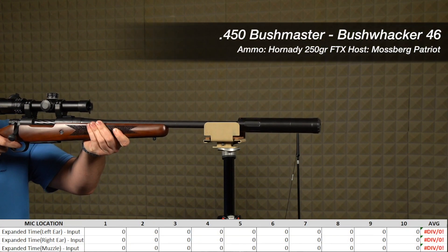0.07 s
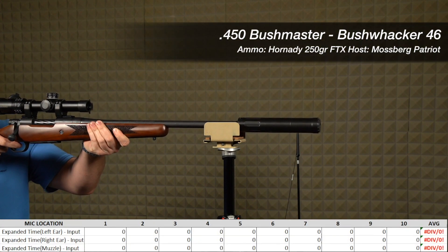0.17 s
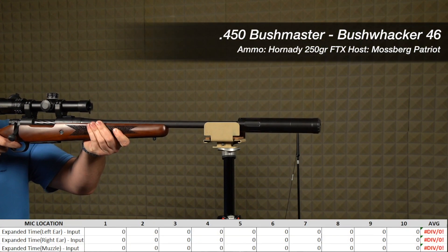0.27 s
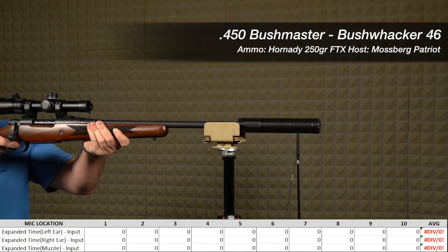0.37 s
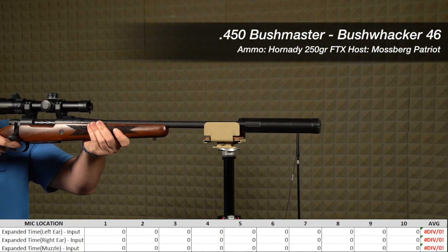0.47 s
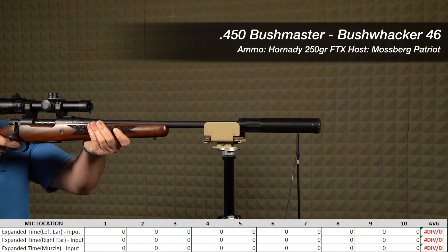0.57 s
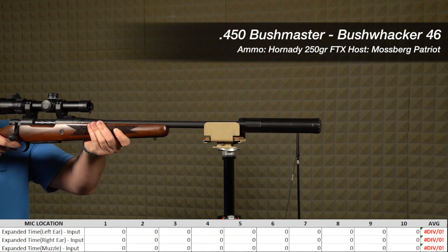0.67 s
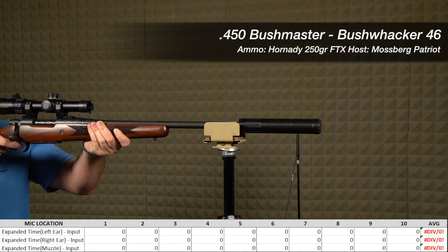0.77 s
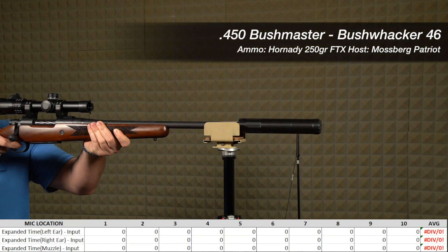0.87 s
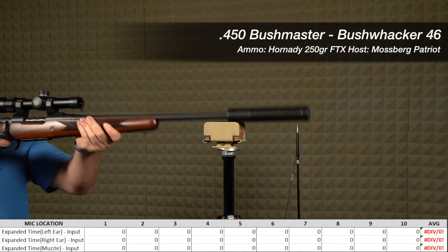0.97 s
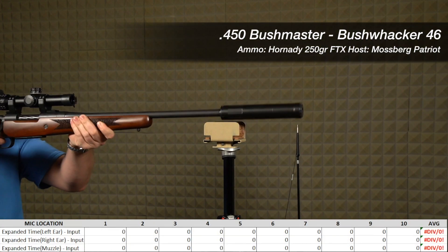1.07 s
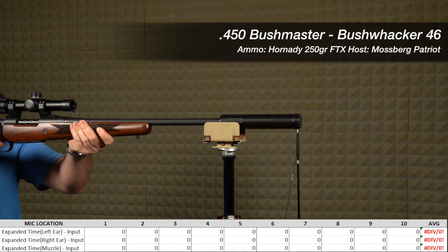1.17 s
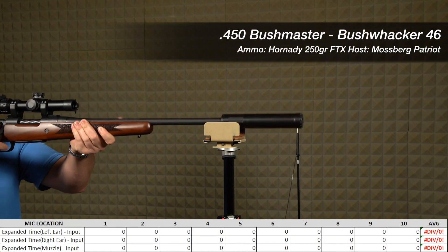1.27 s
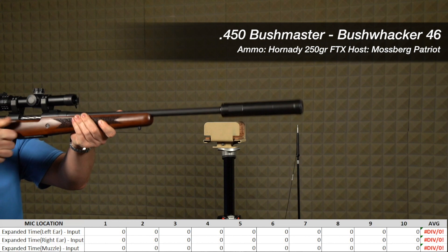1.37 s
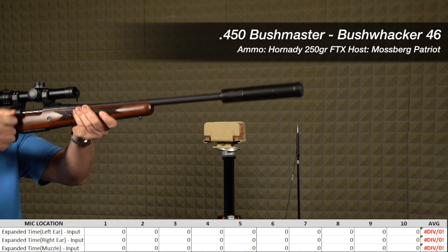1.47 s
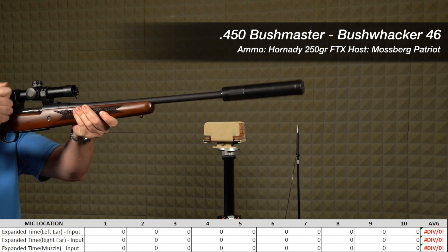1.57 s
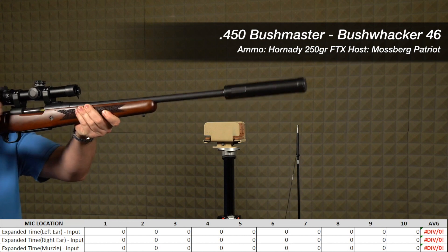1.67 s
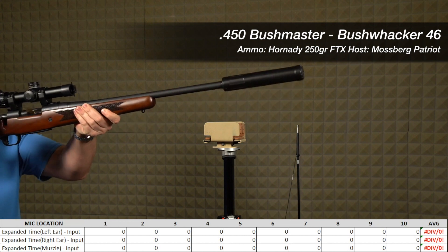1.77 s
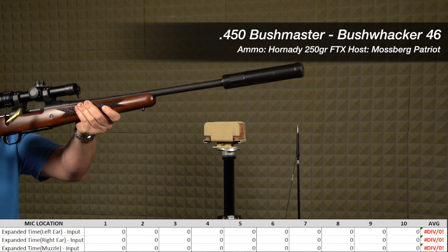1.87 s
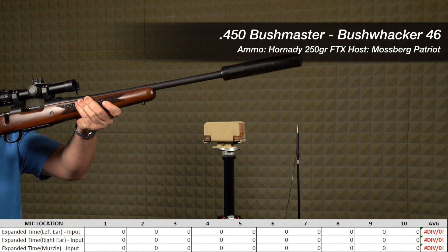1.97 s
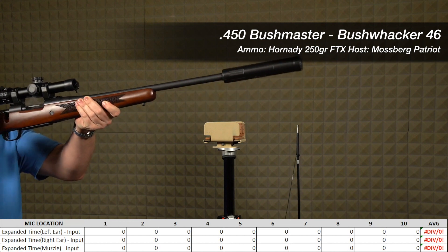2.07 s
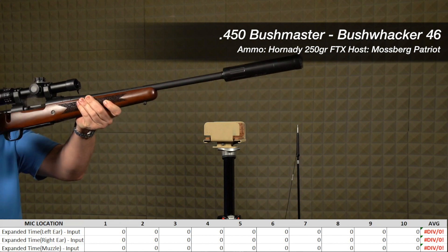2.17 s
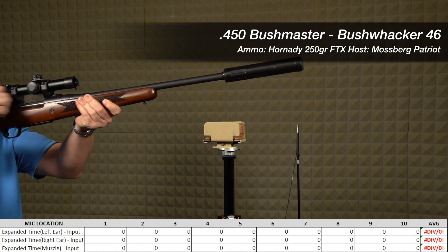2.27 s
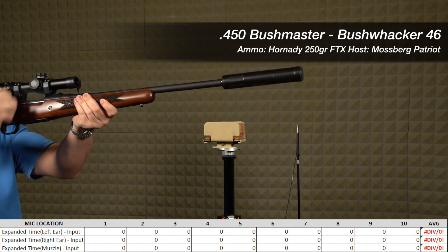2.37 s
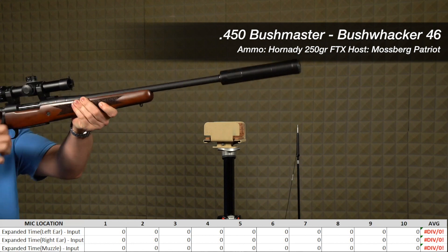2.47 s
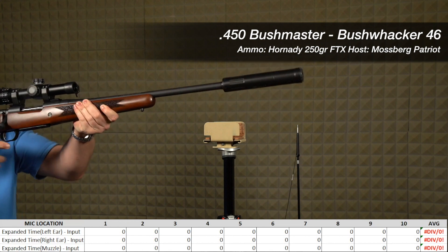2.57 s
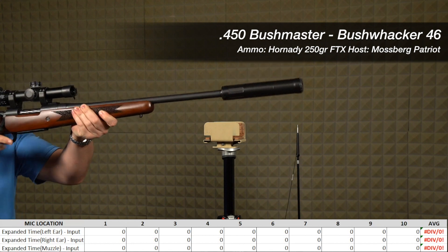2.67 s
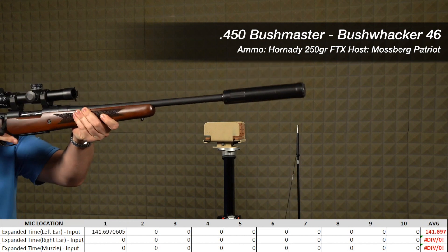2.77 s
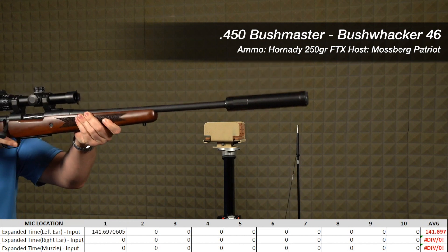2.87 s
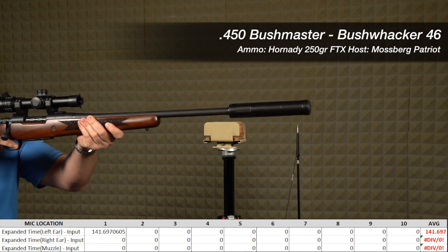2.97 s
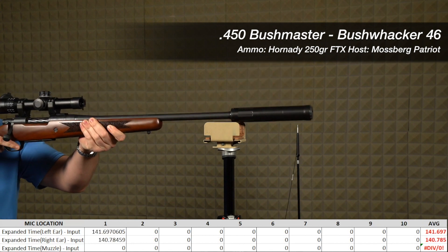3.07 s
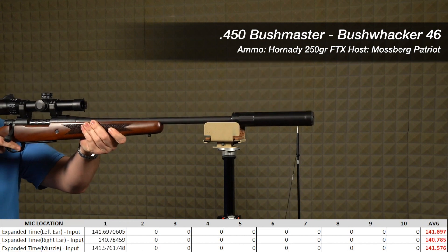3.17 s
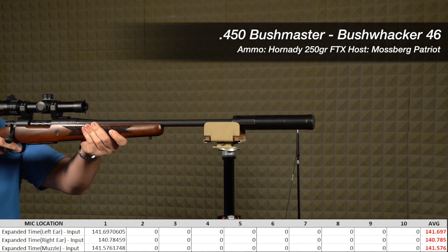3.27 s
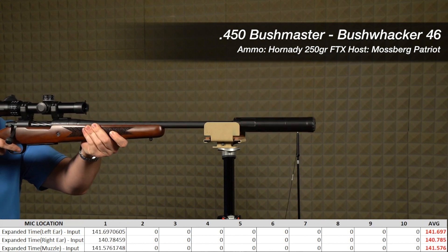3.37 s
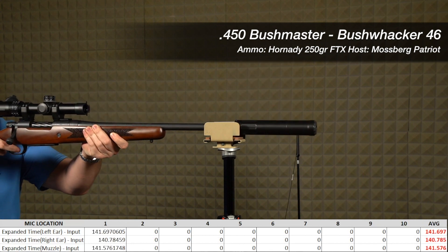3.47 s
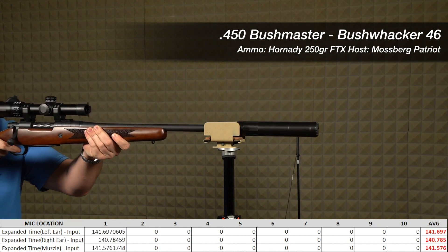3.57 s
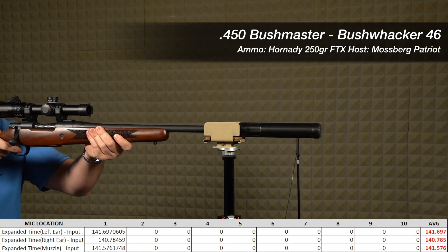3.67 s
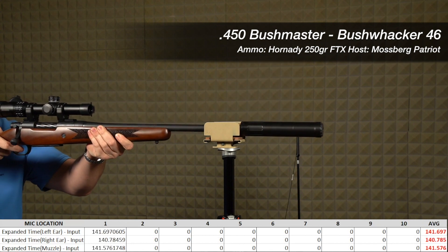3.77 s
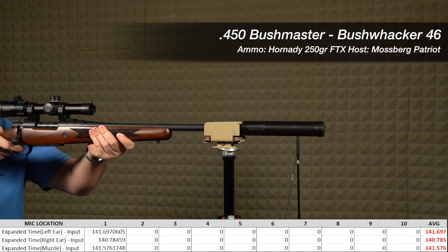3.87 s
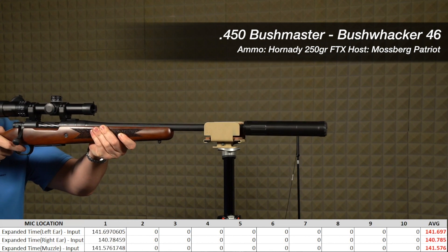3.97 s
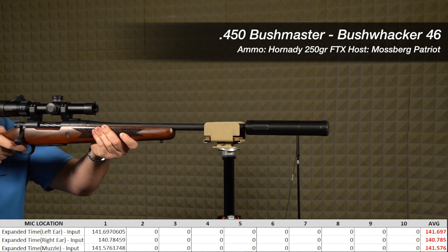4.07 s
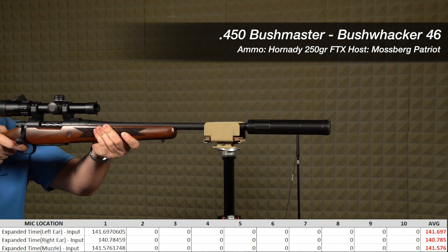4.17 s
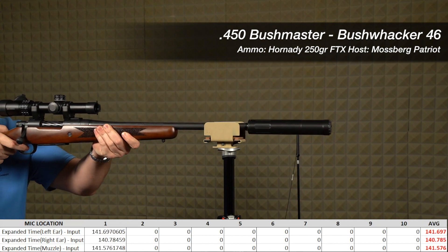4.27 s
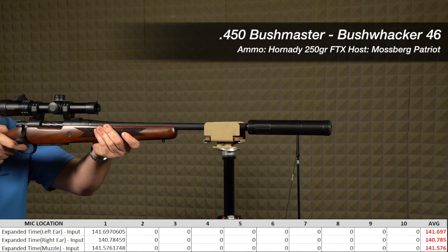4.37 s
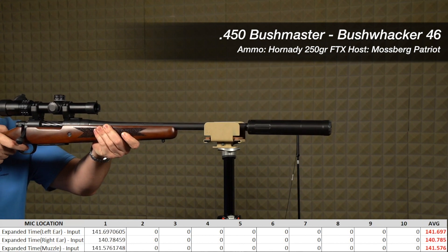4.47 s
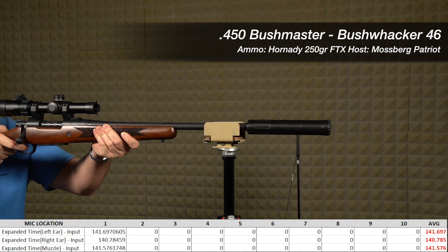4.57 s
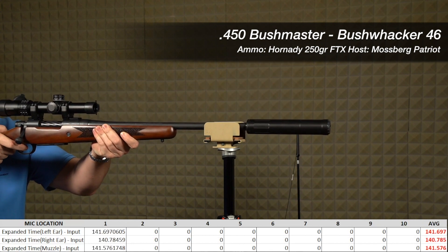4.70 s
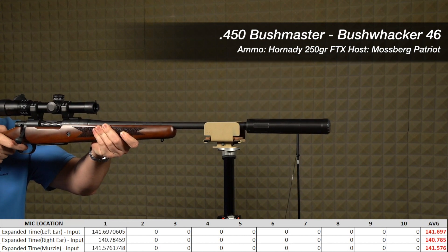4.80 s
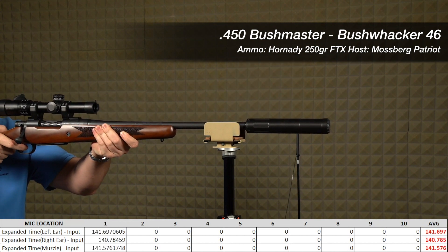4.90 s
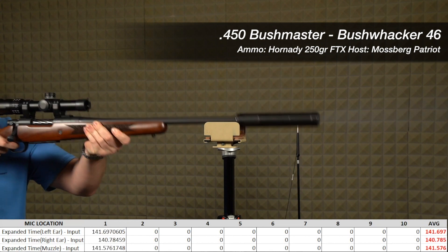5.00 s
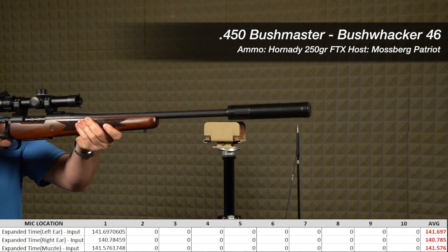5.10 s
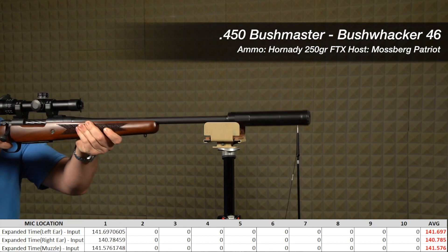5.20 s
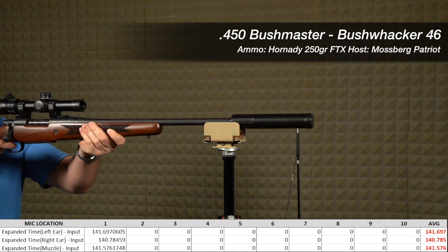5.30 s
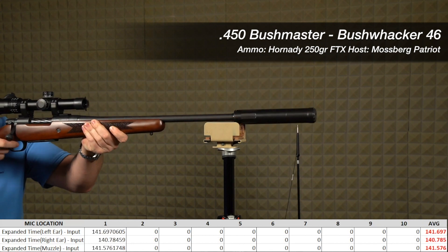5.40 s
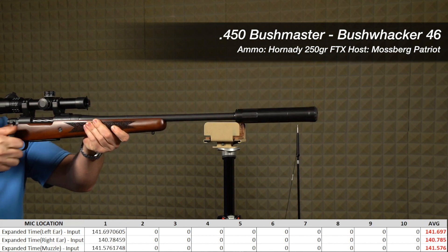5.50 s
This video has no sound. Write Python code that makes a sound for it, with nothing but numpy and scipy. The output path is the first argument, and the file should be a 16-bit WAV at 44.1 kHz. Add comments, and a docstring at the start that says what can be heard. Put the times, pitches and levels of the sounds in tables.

```python
"""A foam-lined booth that opens on an indoor range: two shots from a suppressed bolt-action rifle.
Each blast, decaying noise on swings of pressure, overloads the microphone; a swelling, dying wash answers it.
Between the shots the bolt is lifted, drawn back, run forward and locked: noisy contacts excite modes of steel
and stock. The spent case bounces away, its brass modes beating in pairs; hands bump, rub and tap.
Ventilation murmurs underneath as shaped noise with faint fan tones."""
import sys
import numpy as np
from scipy import signal
from scipy.fft import rfft, irfft, next_fast_len
from scipy.io import wavfile
from scipy.ndimage import uniform_filter1d

SR = 44100
rng = np.random.default_rng(int(sys.argv[2]) if len(sys.argv) > 2 else 0)


def generate_wav(signal):
    """Clip the signal to [-1, 1] and save it as 16-bit WAV at the path in sys.argv[1]."""
    frames = np.transpose(np.atleast_2d(signal))
    scaled = np.clip(frames, -1, 1) * 32767
    pcm = np.round(scaled).astype(np.int16)
    wavfile.write(sys.argv[1], SR, pcm)


N = 244314

# Spectrum of contact noise, before any tilt: [f/Hz, level/dB]
CONTACT_SPECTRUM = [(100, -18), (500, -13), (900, 0), (2200, 10), (3200, 6), (6000, 2), (10000, -1.1),
                    (16000, -14.5)]


def amp(db):
    """Level as gain: 20 dB is a factor of ten in pressure."""
    return 10 ** (np.asarray(db) / 20)


def evened(x):
    """Normalisation to an rms value of 1."""
    return x / np.sqrt(np.mean(x ** 2) + 1e-20)


def read(points, hz, axis=1):
    """Interpolation of one table column along a logarithmic frequency axis."""
    columns = np.transpose(points)
    return np.interp(np.log(hz + 1), np.log(columns[0] + 1), columns[axis])


def add(mix, s, sound):
    """Superposition: pressures add, here from time s onward."""
    part = mix[round(s * SR):][:len(sound)]
    part += sound[:len(part)]


def seconds(length):
    """Sampled time axis of the given length in s."""
    return np.arange(int(length * SR)) / SR


def colour(x, points, tilt_db=0, size=4096):
    """Minimum-phase filtering: the Hilbert transform of log gain gives the phase of a causal filter."""
    hz = np.fft.rfftfreq(size, 1 / SR)
    octaves = np.log2(np.maximum(hz, 400) / 3000)  # the tilt pivots at 3 kHz and is held below 400 Hz
    log_gain = np.log(amp(read(points, hz) + tilt_db * octaves))
    circle = np.r_[log_gain, log_gain[-2:0:-1]]
    taps = np.fft.ifft(np.exp(np.conj(signal.hilbert(circle)))).real
    return signal.fftconvolve(x, taps)[:len(x)]


def ring(t, hz, db, t60):
    """Damped mode: a sinusoid that loses 60 dB in t60."""
    return amp(db - 60 * t / t60) * np.sin(2 * np.pi * hz * t)


def dying_noise(t, table, tilt_db=0, count=36):
    """Frequency-dependent decay: each overlapping band of noise has its own level and t60."""
    hz = np.fft.rfftfreq(len(t), 1 / SR)
    spectrum = rfft(rng.choice([-1., 1.], len(t)))
    centres = np.geomspace(25, 17000, count)
    out = np.zeros(len(t))
    for centre, hat in zip(centres, np.eye(count)):
        band = irfft(spectrum * np.interp(hz, centres, hat), len(t))
        start_db = read(table, centre) + tilt_db * np.log2(centre / 1500)
        out += band * amp(start_db - 60 * t / read(table, centre, axis=2))
    return out


def contact(length, steepness=5):
    """Impact of rough surfaces: random tiny impulses rise fast and decay with the contact time as constant."""
    t = seconds(.25)
    u = t / max(length, 1e-4)
    return rng.choice([-1., 1.], len(t)) * np.exp(-u) * (1 - np.exp(-steepness * u)) ** 2


def ventilation(waver=1.53, hum_db=-3):
    """Broadband flow noise under phase-modulated tones: air rushes steadily and faint fan tones waver."""
    # Flow noise with a broad hump of duct hiss, relative spectral density: [f/Hz, level/dB per Hz]
    air_spectrum = [(15, -25), (30, -5), (64, -3.5), (130, -2), (290, -7), (520, -9.5), (1000, -12.5),
                    (1350, -18), (2000, -15.5), (3000, -20), (4500, -26), (8000, -36), (14000, -49.5),
                    (16000, -65)]
    # Fan tones: [f/Hz, rms level/dB before the common trim hum_db]
    fan_tones = [(70.0, -65), (279.9, -65.5), (382.2, -68.5)]
    air_db = -55.5  # rms
    hz, t = np.fft.rfftfreq(N, 1 / SR), np.arange(N) / SR
    shaped = rfft(rng.standard_normal(N)) * amp(read(air_spectrum, hz))
    air = amp(air_db) * evened(irfft(shaped, N))
    for tone_hz, db in fan_tones:
        drift = evened(irfft(rfft(rng.standard_normal(N)) * (hz < 2), N))  # slower than 2 Hz
        tone = np.sin(2 * np.pi * tone_hz * t + waver * drift)
        air += amp(db + hum_db) * np.sqrt(2) * tone
    return air


def clack(db, length, tilt_db, knock_db, steel_db=-16, tick_db=0, stock_db=-5, detune=0.076):
    """Modal excitation: one contact ticks, drives the receiver's modes and knocks the stock."""
    # Receiver modes: [nominal f/Hz, relative level/dB, t60/s]
    receiver_modes = [(840, 7, 0.027), (1130, -3.5, 0.027), (2117, -1.5, 0.021), (2790, -8, 0.016),
                      (4360, -12, 0.01), (4580, -8, 0.014), (6590, -4, 0.012), (10300, -3, 0.019)]
    # Wooden stock modes: [f/Hz, relative level/dB, t60/s]
    stock_modes = [(47.9, -22.5, 0.12), (120.3, -20, 0.097), (243, -13.5, 0.026), (450, -15.5, 0.0033),
                   (581, 0.5, 0.02), (880, -10, 0.02), (1030, 1, 0.011), (1200, -6.5, 0.0075)]
    t, rub = seconds(.25), contact(length)
    steel = np.zeros(len(t))
    for hz, mode_db, t60 in receiver_modes:
        # the modes shift as the bolt moves
        mode = ring(t, hz * (1 + detune * rng.uniform(-0.81, 1)), 0, t60)
        driven = signal.fftconvolve(rub, mode)[:len(t)]
        steel += amp(mode_db) * np.std(rub) * evened(driven)
    click = colour(amp(tick_db) * rub + amp(steel_db) * steel, CONTACT_SPECTRUM, tilt_db)
    stock = sum(ring(t, *mode) for mode in stock_modes)
    return amp(db) * (click + amp(knock_db + stock_db) * stock)


def muzzle(jet_db, swing_db, tilt_db, stretch, rise=.0006):
    """Jet noise on a blast wave: a burst of turbulent gas rides on a few strong swings of pressure."""
    # Gas leaving the suppressor, before tilt and stretch: [f/Hz, relative level/dB, t60/s]
    gas_bands = [(40.63, -5.5, .09), (109.5, -13.5, .08), (205, 11.5, 0.029), (350, 1.5, 0.061),
                 (600, 6.5, 0.062), (1094, 5, 0.056), (2440, 10.5, 0.03), (4530, -2.5, 0.1),
                 (8480, 0.5, 0.065), (15000, -14, 0.11)]
    # Pressure swings in the booth: [f/Hz, relative level/dB before the envelope, swell time constant/s]
    pressure_swings = [(178, -8, 0.002), (527.6, -13.5, 0.001), (656, 3, 0.00049)]
    t = seconds(.5)
    jet = amp(jet_db) * dying_noise(t / stretch, gas_bands, tilt_db) * (1 - np.exp(-t / rise))
    swings = np.zeros(len(t))
    for hz, db, swell in pressure_swings:
        envelope = (t / swell) ** 2 * np.exp(-t / swell)
        swings += amp(db) * envelope * np.sin(2 * np.pi * hz * t)
    return jet + amp(swing_db) * swings


def range_echo(tilt_db, lumpy_db=2.0, lumpy_time=0.2537):
    """Reverberation: a diffuse wash swells, coarse while reflections are few, with distinct slaps in it."""
    # Reverberation of the range, before tilt: [f/Hz, relative level/dB, t60/s]
    wash_bands = [(39.9, -46.5, .58), (75.86, -45.5, 1.2), (109, -22.5, 3), (158.4, -29.5, 2),
                  (301, -20, 0.69), (688, -17.5, 0.95), (1270, -18, 1.61), (2020, -13.5, 2.23),
                  (3092, -17, 2.24), (4963, -25, 1.6), (7650, -25, 0.76), (10920, -32.5, .6),
                  (15500, -39.5, .27)]
    # Distinct slaps from down the range: [t/s after the shot, relative peak level/dB]
    slap_times = [(.036, -13), (.0522, -14), (.0842, -6.5), (.0917, -15)]
    # Spectrum of one slap: [f/Hz, relative level/dB]
    slap_spectrum = [(200, -12.5), (900, -7.5), (1900, 8), (3300, -21), (8000, -10), (16000, -36)]
    # the wash is weak until the first walls of the range answer
    arrival_s, arrival_rise_s, before_db = 0.021, 0.0011, -5
    # it swells as sound returns from the far end
    far_end_s, far_end_spread_s, far_end_db = 0.077, 0.046, 6
    # separate reflections within that swell
    scatter_per_s, scatter_db = 460, -24

    t = seconds(2.5)
    lumps = evened(uniform_filter1d(rng.standard_normal(len(t)), size=70)) * np.exp(-t / lumpy_time)
    waiting = .5 - .5 * np.tanh((t - arrival_s) / arrival_rise_s)
    far_end = np.exp(-((t - far_end_s) / far_end_spread_s) ** 2)
    wash_db = before_db * waiting + far_end_db * far_end + lumpy_db * lumps
    wash = dying_noise(t, wash_bands, tilt_db) * amp(wash_db)
    struck = rng.random(len(t)) < scatter_per_s / SR
    returns = amp(scatter_db) * far_end * rng.standard_normal(len(t)) * struck
    for delay, db in slap_times:
        add(returns, delay, [amp(db)])
    slap = colour(signal.unit_impulse(SR // 20), slap_spectrum)
    return wash + signal.fftconvolve(returns, slap / abs(slap).max())[:len(t)]


def shots():
    """Source and room response: the firing pin falls, the blast follows and the range answers."""
    # Shots: [t/s, gas jet level/dB, pressure swing level/dB, range echo level/dB,
    # brightness/dB per octave, firing pin force/dB, relative length of the jet]
    shot_list = [(1.0146, -1, 3, 0, -1.55, -31.5, 0.95), (5.0673, -2.5, 1.5, -0.37, -0.36, -31, 0.87)]
    pin_lead_s, pin_contact_s, pin_tilt_db, pin_knock_db = .0045, .0025, -4.5, -18.5
    out = np.zeros(N)
    for s, jet_db, swing_db, echo_db, tilt_db, pin_db, stretch in shot_list:
        add(out, s - pin_lead_s, clack(pin_db, pin_contact_s, pin_tilt_db, pin_knock_db))
        add(out, s, muzzle(jet_db, swing_db, tilt_db, stretch))
        add(out, s, amp(echo_db) * range_echo(tilt_db))
    return out


def bolt(chatter_tilt_db=-2.0):
    """Impact with play: each blow of the loose bolt comes between a light touch and a rebound."""
    # Steel meeting steel: handle lifted (1.65 s), bolt drawn back to its stop (1.87-1.90 s),
    # next round picked up (2.12 s), bolt run forward (to 2.35 s), handle locked down (2.49 s):
    # [t/s, force level/dB, contact time/s, brightness/dB per octave,
    # knock in the stock/dB re force, before the stock's common trim]
    blows = [ (1.6481, -20, 0.0019, -2.5, -6), (1.744, -28.5, .0028, 0.5, -5.5),
             (1.7532, -31, 0.0033, -3, -4), (1.869, -23, 0.0043, -1, -18),
             (1.8744, -11.5, 0.0015, -.5, -24.5), (1.8925, -35.5, 0.0036, -8.5, -17),
             (1.9007, -9.5, .0013, 1.5, -16.5), (2.1183, -34.5, 0.0038, -4, -15),
             (2.1326, -34.5, 0.0033, -4, -12), (2.16, -19, 0.0024, 0, -13), (2.1848, -32, 0.0043, -4.5, 1),
             (2.249, -33, 0.0039, -4.5, -10), (2.2713, -21, 0.001, 0.5, -14.5),
             (2.3132, -40.5, 0.0033, -6, -6.5), (2.3322, -29.5, .003, -1, -21),
             (2.3367, -19, 0.0035, -2.5, -14), (2.3473, -19.5, .0055, -4, -18.5),
             (2.369, -1, 0.0012, 0.5, -15.5), (2.4184, -25, 0.002, -1, -11), (2.4862, -11, 0.002, .3, 2.5)]
    touch_lead_s, touch_db = .0067, -29  # level for a blow of 0 dB
    rebound_lag_s, rebound_db = .0053, -28.5  # likewise
    chatter_growth, chatter_contact_s = 0.46, 0.0026  # growth in dB per dB of the blow
    out = np.zeros(N)
    for s, db, length, tilt_db, knock_db in blows:
        add(out, s, clack(db, length, tilt_db, knock_db))
        for at, base_db in (s - touch_lead_s, touch_db), (s + rebound_lag_s, rebound_db):
            chatter_db = base_db + chatter_growth * db
            add(out, at, clack(chatter_db, chatter_contact_s, tilt_db + chatter_tilt_db, knock_db))
    return out


def booth(x, early_db=-18, early_t60=0.041, late_db=-21.0, count=12):
    """Early reflection and energy storage: foam reflects weakly; each band's energy decays as a diffuse tail."""
    # Lingering of the small sounds: [f/Hz, level/dB re late_db, t60/s]
    tail_bands = [(100, 5, 0.98), (690, -4.5, 0.53), (2000, 0, 1), (3110, 2.5, 0.66), (4994, -3.5, 0.82),
                  (10180, -4.5, 0.65), (14920, -3.5, .36)]
    t, size = seconds(.1), next_fast_len(N, True)
    early = rng.standard_normal(len(t)) * amp(-60 * t / early_t60) * (t > .004)
    out = x + amp(early_db) * signal.oaconvolve(x, early / np.linalg.norm(early))[:N]
    hz, spectrum = np.fft.rfftfreq(size, 1 / SR), rfft(x, size)
    noise = rfft(rng.standard_normal(size))
    centres = np.geomspace(100, 16000, count)
    for centre, hat in zip(centres, np.eye(count)):
        band = np.interp(hz, centres, hat)
        keep = amp(-60 / SR / read(tail_bands, centre, axis=2)) ** 2  # energy left after one sample
        energy = irfft(spectrum * band, size)[:N] ** 2
        stored = signal.lfilter([1 - keep], [1, -keep], energy)
        carrier = evened(irfft(noise * band, size)[:N])
        out += amp(late_db + read(tail_bands, centre)) * np.sqrt(stored) * carrier
    return out


def bumps(rise=0.0025):
    """Damped low modes with a gradual onset: soft knocks of handling, and one faint, dull tap."""
    # The rifle bumps against hand and shoulder: [t/s, level/dB before the onset, f/Hz, t60/s]
    knocks = [(1.649, -34, 232, 0.025), (1.745, -43.5, 127, 0.38), (1.892, -29, 128, 0.085),
              (2.135, -39, 117, 0.19), (2.71, -28, 66, 0.038)]
    # Spectrum of the tap: [f/Hz, relative level/dB]
    tap_spectrum = [(100, 9.5), (800, -2), (1500, -31), (6000, -27), (16000, -51)]
    tap_at_s, tap_db, tap_contact_s = 3.117, -27, 0.004
    t, out = seconds(.5), np.zeros(N)
    for s, db, hz, t60 in knocks:
        add(out, s, ring(t, hz, db, t60) * (1 - np.exp(-t / rise)))
    add(out, tap_at_s, amp(tap_db) * colour(contact(tap_contact_s), tap_spectrum))
    return out


def slides(grain_db=3, edge=0.94):
    """Friction: sliding surfaces make a dense, uneven run of tiny catches, heard as modulated noise."""
    # Sliding contact: the bolt starts back, it drags the case out, the round scrapes into the
    # chamber, the hand returns to the grip: [start t/s, end t/s, level/dB before colouring,
    # brightness/dB per octave]
    rubs = [(1.702, 1.80, -48, -4), (1.824, 1.866, -48.5, -4), (2.339, 2.354, -16.5, -2),
            (2.679, 2.822, -66.5, 1)]
    out = np.zeros(N)
    for start, end, db, tilt_db in rubs:
        n = round((end - start) * SR)
        grains = evened(uniform_filter1d(rng.standard_normal(SR), size=40))[:n]
        rough = evened(rng.standard_normal(SR)[:n] * amp(grain_db * grains))
        rub = rough * signal.windows.tukey(n, edge)
        add(out, start, amp(db) * colour(rub, CONTACT_SPECTRUM, tilt_db))
    return out


def landing(tick_db, ring_db, contact_time=0.0015, tilt_db=5.5, split_hz=45, twin_db=-7):
    """Split modes: the brass tube ticks on the floor and rings in close pairs that beat."""
    # Mouth, wall and high modes of the case, lower of each pair: [f/Hz, t60/s]
    brass_modes = [(2160, .075), (5155, 0.38), (12335, 0.25)]
    t, out = seconds(1), np.zeros(SR)
    add(out, 0, amp(tick_db) * colour(contact(contact_time), CONTACT_SPECTRUM, tilt_db))
    for (hz, t60), db in zip(brass_modes, ring_db):
        out += ring(t, hz, db, t60) + ring(t, hz + split_hz, db + twin_db, t60)
    return out


def spent_case(count=5):
    """Inelastic bouncing: the case rings in its own balance at each landing, then hops ever faster to rest."""
    # Landings: [t/s, tick level/dB before colouring, mouth ring level/dB, wall ring level/dB, high ring level/dB]
    landings = [(1.838, -63, -60, -73, -65), (2.48, -54, -61, -73, -47), (2.893, -44.5, -43.5, -73, -53),
                (2.926, -53.5, -51, -80, -73), (3.080, -42, -55, -74, -78), (3.286, -43, -73, -65, -55)]
    hop_s, hop_ratio = .1165, .72  # first hop, and each hop relative to the one before
    hop_tick_db, hop_ring_db = -4, -4.5  # change with each hop
    out = np.zeros(N)
    for s, tick_db, *ring_db in landings:
        add(out, s, landing(tick_db, ring_db))
    s, tick_db, *ring_db = landings[-1]
    for hop in range(1, count + 1):
        s += hop_s * hop_ratio ** (hop - 1)
        add(out, s, landing(tick_db + hop * hop_tick_db, np.add(ring_db, hop * hop_ring_db)))
    return out


def scene():
    """Superposition of rifle, case, handling and ventilation at one microphone."""
    small_sounds = bolt() + slides() + spent_case()
    return (shots() + booth(small_sounds) + bumps() + ventilation())[None]


def record(dry, ceiling_db=-5.5, low_cut_hz=37):
    """Saturation and band limiting: the input stage flattens peaks and sheds the deepest bass and top treble."""
    ceiling = amp(ceiling_db)
    clipped = dry / (1 + (dry / ceiling) ** 6) ** (1 / 6)
    clipped = signal.lfilter(*signal.butter(1, low_cut_hz, "high", fs=SR), clipped)
    band_limit = signal.firwin(255, 16100, window=("kaiser", 9), fs=SR)  # cutoff in Hz
    return signal.oaconvolve(clipped, band_limit[None], "same")


dry = scene()
out = record(dry)
generate_wav(out)
```